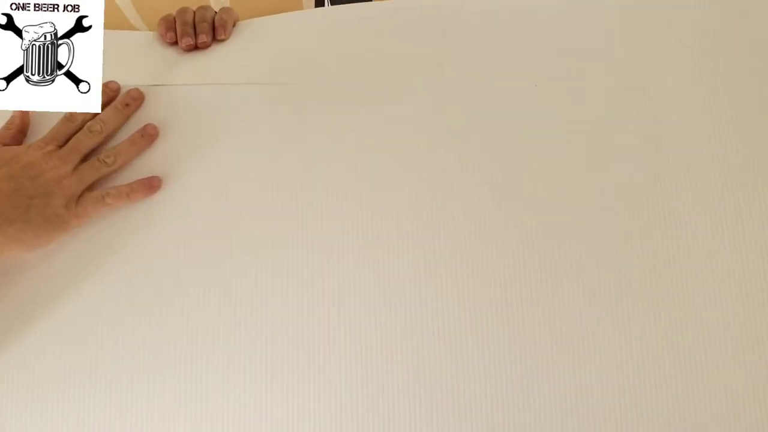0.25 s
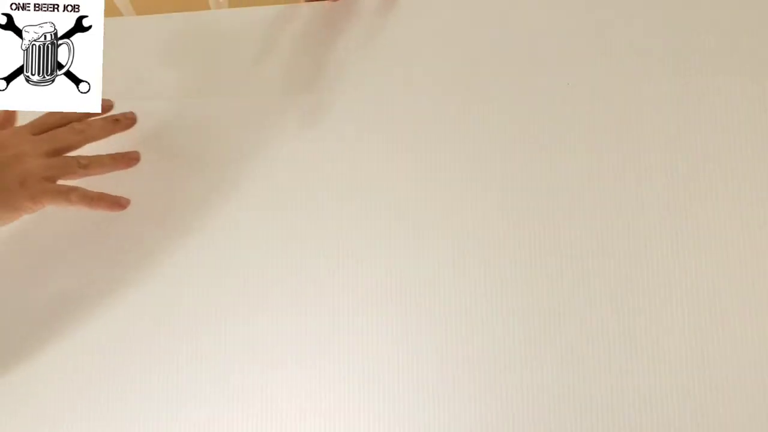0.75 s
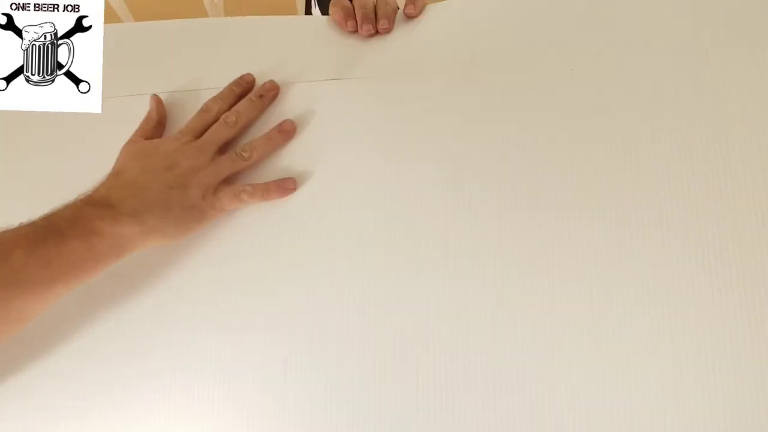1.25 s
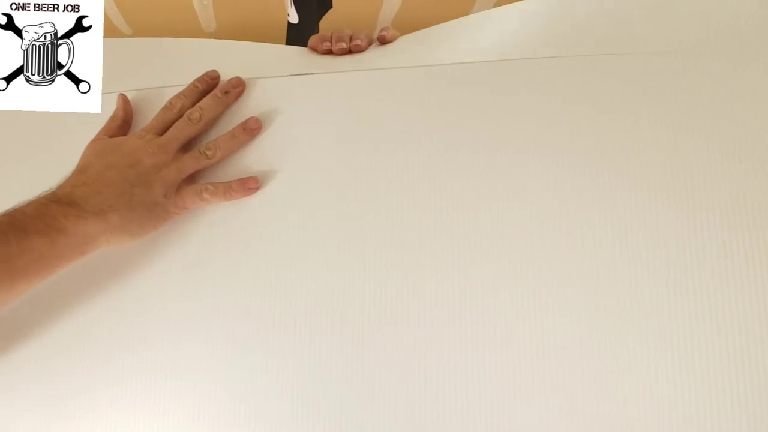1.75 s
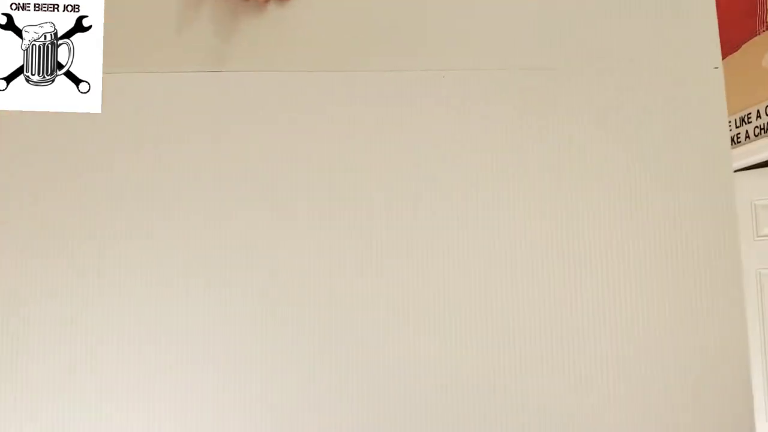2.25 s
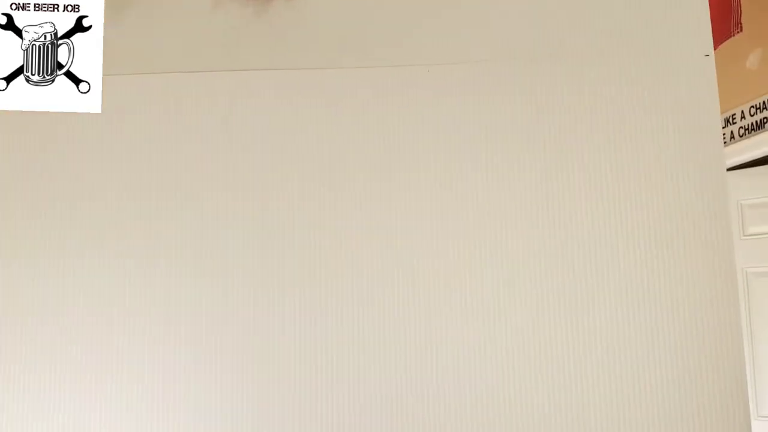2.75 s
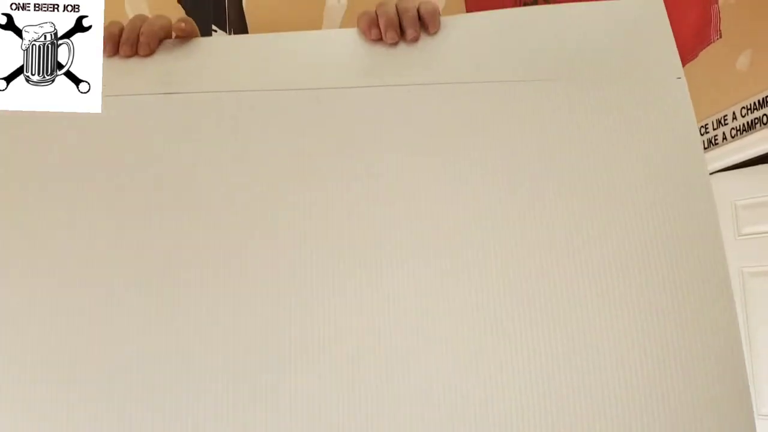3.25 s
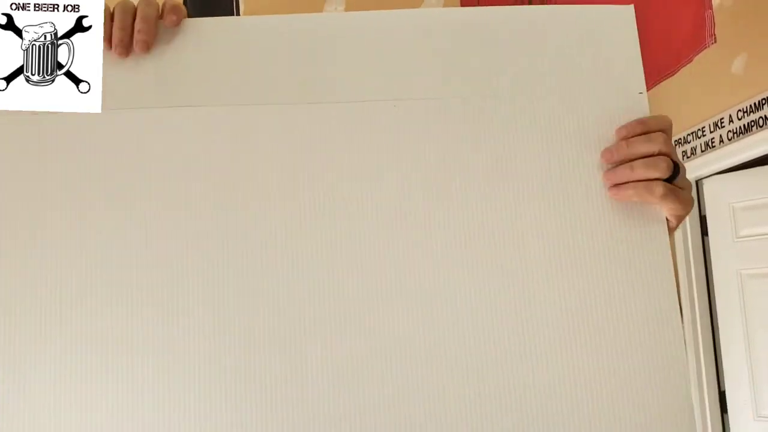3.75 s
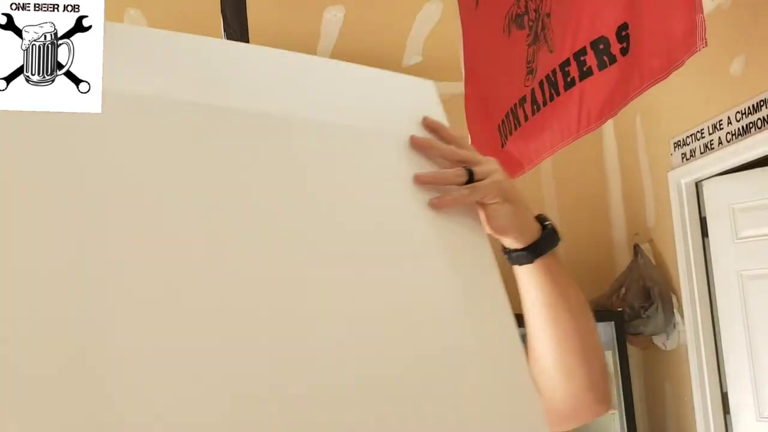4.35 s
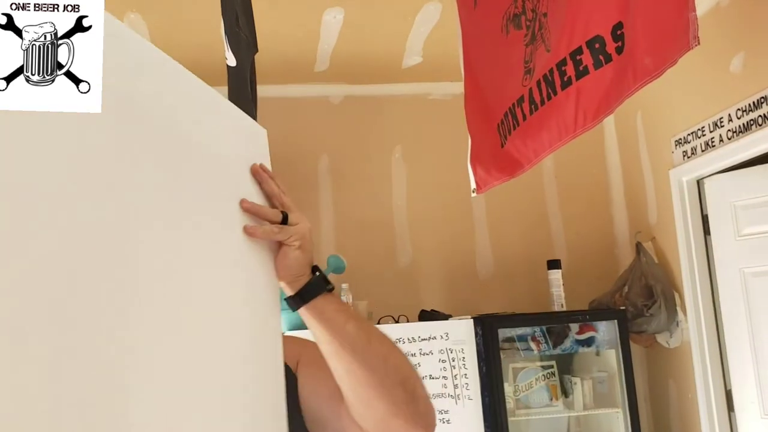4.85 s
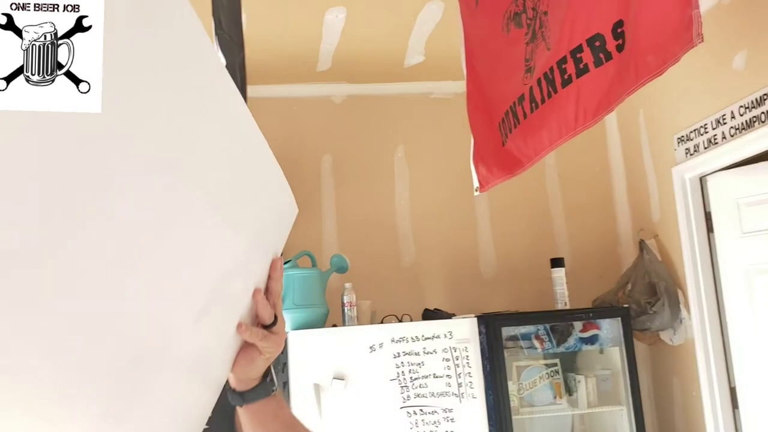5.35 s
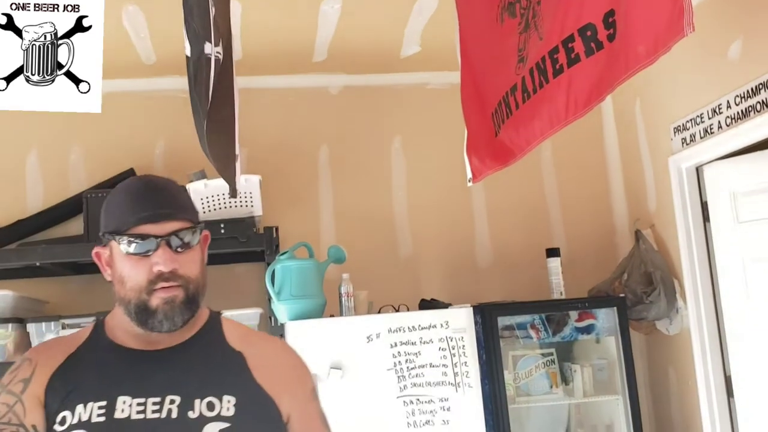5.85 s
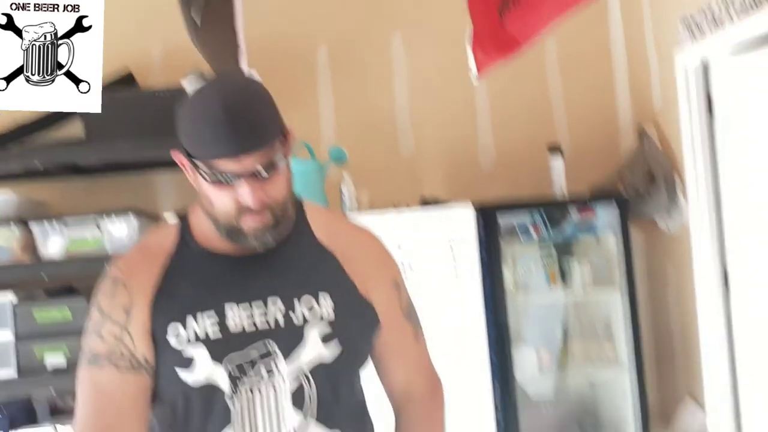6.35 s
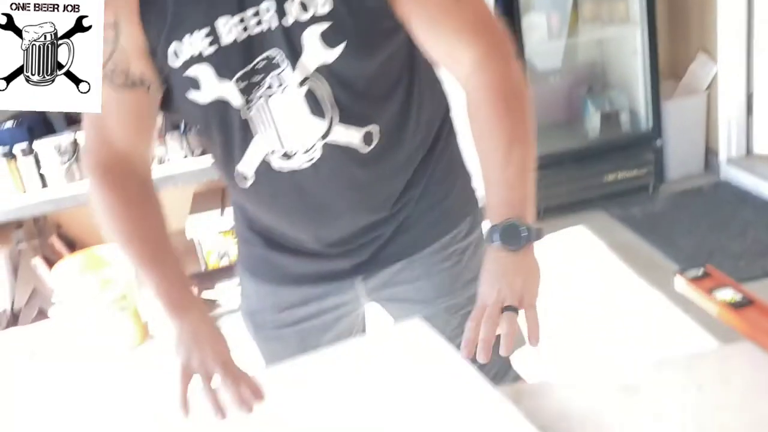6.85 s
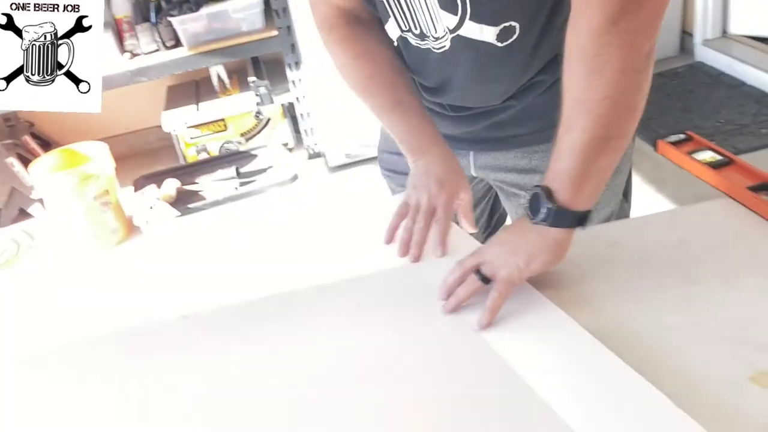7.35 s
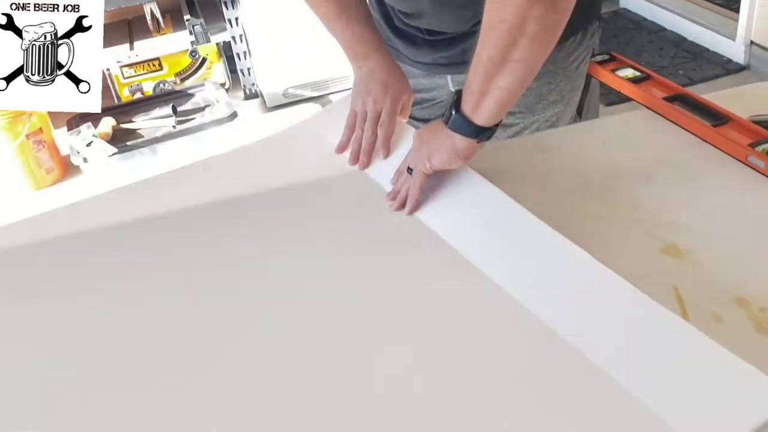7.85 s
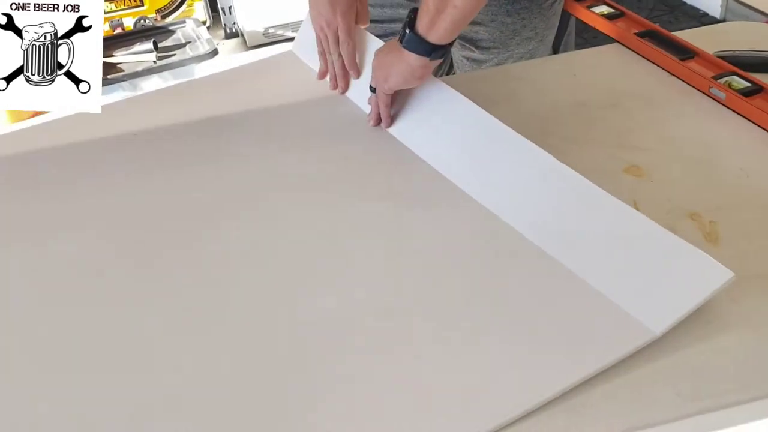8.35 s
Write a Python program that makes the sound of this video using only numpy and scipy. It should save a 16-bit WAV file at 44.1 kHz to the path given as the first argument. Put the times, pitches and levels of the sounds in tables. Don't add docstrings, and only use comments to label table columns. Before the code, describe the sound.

A low cooler hum runs steadily in a bare-walled garage. Close to a small camera, a large fluted plastic sheet starts with a soft bump, then at 0.4-0.7 s scrapes, clicks and booms hollowly. At 1.0-1.4 s come more knocks, hand rubs and dry ticks, then a near-quiet lull with faint fingertip pricks. From 2.0 to 3.1 s it drags, thumps and hisses under palms; 3.2-3.8 s brings a denser cluster of scrapes, ticks and a thin creak. Sparse ticks and rubs follow until 4.8 s, when the edge ratchets quickly. At 5.2 s a bright swish begins the turn, with a heavy thud at 5.55 s. Softer sliding fades through 6-7 s, with smoothing rubs near 7.4 s. Light knocks and clicks at 7.7 s lead to bending creaks around 8.0 s, then a very loud, sharp fold crack at 8.28 s, short slap echoes, a dying rattle and hum.

```python
import sys
import numpy as np
from scipy import signal
from scipy.fft import rfft, irfft, next_fast_len
from scipy.io import wavfile
from scipy.ndimage import uniform_filter1d

SR = 44100
rng = np.random.default_rng(int(sys.argv[2]) if len(sys.argv) > 2 else 0)


def amplitude_ratio(level_db):
    exponent = np.asarray(level_db, float) / 20
    return 10 ** exponent


def log_audio(samples):
    frames = np.atleast_2d(samples).T
    limited = np.clip(frames, -1, 1)
    pcm = np.round(limited * 32767).astype(np.int16)
    wavfile.write(sys.argv[1], SR, pcm)


N = 378495

# frequency in [Hz], level in [dB per Hz].
HUM_COLOUR = [(25, -13), (114, 2), (206, -7), (285, 4), (503, -20.5), (780, -11), (1040, -28.5),
              (1500, -27.5), (2100, -24.5), (2800, -70), (6740, -33), (8360, -57), (11900, -41.5),
              (16000, -34)]
# frequency in [Hz], level in [dB per Hz].
FLEX_COLOUR = [(15, -55), (25, -18), (48, -8), (96, -16.5), (130, 1), (209, -14), (276, -6.5), (400, -28),
               (520, -19.5), (880, -120)]
# frequency in [Hz], level in [dB].
DRAG_COLOUR = [(200, -11), (340, 1.5), (480, -1), (800, -8.5), (1250, -11), (1700, -31.5), (3000, -37.5)]
# frequency in [Hz], level in [dB].
SCRAPE_COLOUR = [(450, -11), (1000, -3), (1500, -1.5), (2150, -2.5), (2700, -4.5), (3300, -11),
                 (6500, -18.5), (16000, -22)]
# frequency in [Hz], level in [dB].
SLIDE_COLOUR = [(1800, -15), (3000, 3), (4300, -1.5), (5200, -1), (6800, 3), (10000, 2), (16000, -1.5)]
# time in [s], level in [dB].
SWAY = [(0, -44.5), (.35, -46.5), (.6, -27), (.8, -55), (1.2, -30), (1.55, -56.5), (2.45, -34.5),
        (2.75, -38), (3.0, -37), (3.15, -41.5), (3.7, -38), (3.95, -50.5), (5.0, -57.5), (5.27, -34.5),
        (5.4, -51), (6.4, -51.5), (7.3, -54.5), (8.0, -40.5)]
# peak in [s], rise in [s], fall in [s], drag in [dB], scrape over drag in
# [dB].
EDGE_STROKES = [(.058, 0.077, 0.081, -44.5, -13), (0.453, 0.03, 0.13, -33, 0),
                (.525, 0.026, 0.084, -38, -1), (.61, 0.078, 0.097, -37, -7), (.8, 0.17, 0.054, -62.5, 9),
                (1.081, 0.017, 0.3, -47, 2), (1.225, 0.3, 0.2, -40, -18), (1.27, 0.036, .07, -42, -9.5),
                (1.372, 0.035, 0.034, -41.5, -19), (1.41, 0.09, 0.055, -49.5, -13),
                (1.833, 0.061, 0.37, -46, -21.5), (2.073, 0.055, 0.095, -34.5, -10),
                (2.241, 0.053, 0.15, -31.5, -6.5), (2.478, 0.018, 0.3, -47, 6),
                (2.54, 0.26, 0.15, -40.5, -18), (2.93, 0.19, 0.56, -47, -13),
                (3.11, 0.64, 0.16, -58.5, 6.5), (3.27, 0.064, 0.14, -44, -12),
                (3.33, 0.023, 0.078, -39, -13), (3.395, 0.096, 0.14, -30.5, -11),
                (3.53, 0.068, 0.066, -44.5, -11), (3.468, .018, 0.057, -31.5, -3.5),
                (3.612, 0.038, 0.13, -36, -2), (3.787, 0.058, 0.11, -43.5, -5.5),
                (4.05, 0.14, 0.09, -58, -7.5), (4.301, 0.16, 1, -60, -4.5),
                (4.505, 0.071, 0.36, -47.5, -10.5), (4.77, 0.026, 0.73, -47, -10.5),
                (4.86, 0.059, 0.11, -50, -7), (4.91, .015, 0.05, -53, -10), (5.04, 0.051, 0.8, -51, -11),
                (5.206, 0.0091, 0.34, -43, 10.5), (5.26, 0.056, 0.24, -49, 17.3),
                  (5.455, 0.2, 0.13, -39, -1), (5.4, .1, .1, -45, 6), (5.55, 0.16, 0.19, -31.5, -1.5),
                  (5.68, 0.38, 0.23, -41.5, -1.5), (5.95, 0.23, 0.18, -53, 13.5),
                  (6.02, 0.25, .05, -53, 11.5), (6.22, 1, 1, -50, -10.5), (6.44, 0.018, 0.68, -62, 7),
                  (6.59, 0.22, 0.23, -47, -6.5), (6.655, 0.093, 0.12, -50, 3),
                  (7.169, 0.58, 0.63, -56.5, -5), (7.36, 0.022, 0.38, -47, -9),
                  (7.44, 0.12, 0.19, -52.5, 8), (7.703, 0.025, 0.09, -40, -4),
                  (7.926, .015, 0.15, -47.5, -13), (8.055, 0.082, 0.13, -43.5, -2.5),
                  (5.86, 0.51, 0.18, -48.5, 8), (7.97, 0.016, 0.19, -51, -3)]
# peak in [s], rise in [s],
# fall in [s], level in [dB], resonance in [Hz].
HAND_SLIDES = [(.058, 0.043, 0.079, -54, 5600), (.8, 0.31, 0.23, -55.5, 3340),
               (1.098, 0.045, 0.2, -44.5, 5500), (1.072, .008, .1, -49, 4460),
               (1.01, .015, .15, -56, 14500), (1.75, 0.25, 0.06, -66, 7000), (1.72, .1, .12, -67, 4400),
               (1.61, .1, .1, -68, 6300), (2.005, .012, .1, -62, 6800), (.35, .01, .25, -62, 6500),
               (.41, .08, .05, -58, 13000), (2.25, 0.045, 0.17, -43.5, 3500),
               (2.476, 0.035, 0.1, -43.5, 5230), (2.755, 0.072, 0.25, -49.5, 5240),
               (2.9, 0.04, 0.42, -48, 14500), (2.72, 0.032, 0.089, -55.5, 13000),
               (3.0, 0.18, 0.11, -48, 7000), (3.05, .015, 0.15, -47.5, 4700),
               (3.115, 0.14, 0.081, -45.5, 3500), (3.617, 0.03, 0.054, -36, 4600),
               (3.785, 0.071, 0.093, -42.5, 10000), (4.12, 0.15, 0.13, -63, 12000),
               (4.335, 0.081, 0.18, -51, 10700), (4.505, 0.022, 0.12, -49.5, 4300),
               (4.764, 0.011, 0.07, -49.5, 6500), (4.8, .04, .08, -53, 6000),
               (4.87, 0.14, 0.14, -50.5, 3900), (.53, 0.085, 0.065, -40.5, 4000),
               (0.461, 0.027, 0.05, -45.5, 12000), (.66, 0.2, 0.089, -53, 12300),
               (3.54, 0.05, 0.13, -52, 9090), (4.2, 0.18, 0.41, -63, 7600), (5.09, 0.18, 0.67, -59, 6250),
               (6.3, 0.23, 0.5, -54.5, 4480), (5.207, 0.013, 0.13, -28.5, 5000),
                  (5.265, 0.065, 0.084, -31.5, 4030), (5.55, 0.093, 0.036, -35, 3600),
                  (5.96, 0.22, 0.17, -42.5, 3780), (6.02, 0.17, 0.036, -44, 4230),
                  (6.441, 0.021, 0.23, -42, 4300), (7.1, 0.84, 0.64, -66, 3540),
                  (7.295, 0.1, 0.15, -55, 5500), (7.25, .03, .1, -59, 4200),
                  (7.375, 0.018, 0.24, -44.5, 3900), (7.42, 0.08, 0.14, -40, 3660),
                  (7.48, 0.12, 0.08, -45, 3640), (7.55, .1, .15, -58, 3500), (6.99, .08, .12, -62, 14000),
                  (7.67, .06, .06, -66, 14500)]
# time in [s], resonance height in [dB].
FLUTES_OPEN = [(5.1, 3.5), (5.2, 7), (5.72, 7), (5.85, 4)]
# frequency in [Hz], t60 in [s].
WALL_DECAY = [(100, 0.18), (500, 0.68), (2000, 0.53), (6000, 0.39), (12000, 0.17)]
# start in [s], peak in [dB], pitch in [Hz], t60 in [s].
BUMPS = [(0.039, -22.5, 85, 0.088), (0.43, -14, 297, 0.15), (0.5, -20.5, 172, 0.11),
         (1.051, -15.5, 109, 0.079), (2.238, -17, 420, 0.081), (2.05, -26, 140, .2), (2.9, -26, 50, .25),
         (2.479, -13, 67, 0.19), (2.538, -17, 134.6, 0.19), (2.846, -20.5, 98, 0.15),
         (3.391, -22.5, 260, 0.16), (3.604, -23.5, 184.5, 0.23), (5.439, -19, 300, 0.13),
         (5.475, -23, 310, .1), (5.543, -9, 128, 0.18), (5.546, -15, 215, .08), (5.565, -18, 340, .14),
         (5.59, -21, 400, .12), (5.24, -21, 140, .12), (5.22, -22, 52, .2), (6.641, -26, 120, 0.18),
         (7.701, -24, 385, 0.15), (0.519, -18, 160, 0.087), (.6, -22, 51.6, 0.22), (0.996, -23.5, 65, 0.16),
         (2.66, -21, 50, 0.13), (2.93, -27, 113, 0.54), (3.69, -28, 65, 0.43), (4.765, -28, 220, 0.12),
         (4.85, -29, 300, .1), (1.369, -21, 330, 0.083), (8.041, -25.5, 226, 0.23), (6.708, -32, 74, 0.36),
         (7.0, -34, 47, 0.22), (8.284, -26, 69, 0.19), (8.2878, -13.5, 139, .22),
         (8.2928, -13.5, 123.5, .24), (8.289, -15, 129, .11), (8.29, -22.5, 305, 0.33),
         (3.318, -20, 190, .07), (3.335, -21, 300, .09), (3.365, -22, 270, .1), (3.404, -17, 240, .09),
         (3.418, -19, 300, .1), (3.478, -20, 240, .08), (3.7, -29, 220, .15), (5.8, -25.5, 200, .2),
         (5.56, -18.5, 192, 0.18), (5.655, -26, 150, .12), (5.5, -34, 250, 0.13), (1.7, -29.5, 120, 0.25)]
# start in [s], peak in [dB], pitch in [Hz], brightness in [dB].
TICKS = [(0.436, -43, 1800, -17), (1.07, -31, 660, -26), (1.363, -43.5, 1050, -42), (1.411, -55, 660, -14),
         (1.81, -83, 754, -38), (1.834, -63, 760, -21), (2.002, -52, 636, -20), (2.04, -44, 786, -4),
         (2.22, -24, 910, -23), (2.472, -25.5, 2310, -11), (3.251, -65, 690, 17), (3.32, -38, 745, -18),
         (3.458, -18.5, 1080, -23), (3.601, -32, 830, -16), (3.794, -30, 865, 0), (3.975, -42, 750, -17.5),
         (4.043, -48, 730, 7), (4.223, -37, 630, -12), (4.5, -25.5, 660, -19), (4.605, -31.5, 697, -30),
         (4.644, -52, 820, -18), (4.69, -39, 824, -24.5), (4.763, -42, 760, 0), (4.796, -50, 1770, 2),
         (4.909, -34, 800, -15), (6.421, -64, 830, -18), (7.698, -28, 704, -36), (7.92, -54, 644, -24)]
# start in [s], peak in [dB], pitch in [Hz],
# brightness in [dB].
RIM_STEPS = [(4.8479, -38, 1780, -10), (4.9432, -35, 2000, -8), (5.013, -33.5, 2200, -16),
             (5.0536, -33.5, 2200, -14), (5.0912, -31.5, 1810, -14), (5.126, -34, 1840, -14),
             (5.1506, -33.5, 1970, -10), (5.1866, -36, 2200, -14), (4.909, -35, 1300, -10),
             (5.111, -38, 1200, -20), (5.081, -39, 1000, -20), (5.034, -40, 900, -22),
             (4.768, -33, 900, -14), (1.092, -29, 900, -14), (1.142, -29, 1500, -14),
             (1.155, -28, 900, -18), (1.172, -28, 1600, -14), (1.267, -31, 1300, -12),
             (1.371, -33, 1100, -12), (1.404, -38, 900, -22), (1.412, -35, 1900, -4), (1.81, -42, 800, -30),
             (1.837, -41, 900, -12), (0.437, -26, 1000, -14), (0.447, -23, 1400, -14),
             (0.454, -22, 1800, -16), (0.463, -24, 1700, -14), (0.474, -27, 1300, -14),
             (2.041, -37, 900, -16), (2.053, -33, 1200, -16), (2.22, -32, 900, -14),
             (0.607, -31, 1100, -16), (0.524, -30, 1300, -12), (1.362, -36, 1100, -16),
             (2.397, -37, 1200, -16), (2.44, -38, 1200, -16), (3.257, -38, 1300, -18),
             (3.32, -30, 1300, -14), (3.372, -30, 1200, -16), (3.456, -23, 1900, -10),
             (3.772, -33, 1500, -8), (7.698, -31, 1100, -18), (7.712, -32, 2100, -14),
             (7.92, -34, 1300, -28), (8.0, -28, 1300, -16), (8.02, -23, 1100, -18), (8.105, -31, 1500, -12),
             (8.131, -36, 900, -20)]
# start in [s], end in [s], rate in [slips per s], resonance in [Hz], level in [dB].
CREAKS = [
    (.52, .545, 200, 1600, -33),
    (.595, .63, 180, 1000, -31),
    (1.36, 1.385, 200, 2350, -41),
    (3.63, 3.675, 90, 2450, -33),
    (3.675, 3.765, 75, 2450, -43),
    (5.105, 5.145, 170, 520, -33),
    (7.965, 8.05, 190, 1120, -26),
    (8.03, 8.082, 200, 800, -25),
    (8.05, 8.08, 170, 1200, -28),
    (8.085, 8.14, 130, 900, -34),
]
# start in [s], peak in [dB], pitch in [Hz].
PEELS = [
    (1.5562, -60, 6400),
    (1.6036, -58, 6700),
    (1.6645, -58, 7100),
    (1.7009, -64.5, 6450),
    (1.7383, -63, 6800),
    (1.31, -58.5, 6200),
]
# start in [s], level in [dB], brightness in [dB], left over right in [dB].
CRACKS = [
    (8.28142, 14.3, -21, 3.7),
    (8.2885, 7, -15, 8),
    (8.2945, -2, -9, -3),
    (8.3007, 1, -16, 7),
    (8.310, -4, -14, -4),
]
# frequency in [Hz], level in [dB], t60 in [s].
CRACK_MODES = [(700, -33, .02), (1000, -15, .012), (1385, 19.5, .0028)]
# frequency in [Hz], level in [dB per Hz].
RATTLE_COLOUR = [(35, -45), (60, -19), (146, 1), (469, -7), (666, -1), (882, -7.5), (1220, -0.5),
                 (3190, -13), (6740, -18), (8120, -12.5), (16000, -23)]
# frequency in [Hz], likeness from 0 to 1 [ratio].
LEFT_RIGHT_ALIKE = [(30, .97), (200, 0.96), (400, 0.93), (800, 0.49), (1500, 0), (3000, 0), (12000, 0.065)]
# frequency in [Hz], gain in [dB].
MIC_RESPONSE = [(20, -29), (45, 0.5), (6900, -0.5), (7500, -4.5), (8300, -16), (9500, -12.5), (12000, -3.5),
                (15500, -2)]

STROKE_DEPTH_DB, CROWN, IDLE_DB = 22, 1.08, -76
SHAKE_DB, SKIN_DB = -2.5, -8
GRIP_HZ, LET_GO_S = 3900, 8.38


def unit(x):
    return x / np.sqrt(np.mean(x ** 2) + 1e-20)


def along(points, hz):
    f, v = np.transpose(points)
    return np.interp(np.log(hz + 1), np.log(f + 1), v)


def wobble(rate):
    knots = rng.standard_normal(N // 64)
    return np.interp(np.arange(N) * rate / SR, np.arange(len(knots)), knots)


def filtered(x, response):
    m = next_fast_len(N + 8192)
    return irfft(rfft(x, m) * response(np.fft.rfftfreq(m, 1 / SR)), m)[..., :N]


def half_angle(hz):
    return np.arccos(np.clip(along(LEFT_RIGHT_ALIKE, hz), -1, 1))[:, None] / 2


def rush(spectrum, grit=1, patchy_db=2, size=1024, count=N, moving=lambda hz, t: 1):
    hz, t, z = signal.stft(grit * rng.standard_normal((2, count)), SR, nperseg=size)
    patches = uniform_filter1d(rng.standard_normal(z.shape[1:]), size=9, axis=0)
    patches = uniform_filter1d(patches, size=5, axis=1)
    turn = half_angle(hz)
    z = z * amplitude_ratio(patchy_db * unit(patches) + along(spectrum, hz)[:, None]) * moving(hz[:, None], t)
    mid, side = signal.istft(z * [np.cos(turn), np.sin(turn)], nperseg=size)[1][:, :count]
    return np.array([mid + side, mid - side]) / np.std(mid)


def panned(x, left_db):
    return x * amplitude_ratio(np.array([[.5], [-.5]]) * left_db)


def ring(hz, t60, attack, t):
    return np.sin(2 * np.pi * hz * t) * amplitude_ratio(-60 * t / t60) * (1 - np.exp(-t / attack))


def add(track, s, x):
    track[:, round(s * SR):][:, :x.shape[1]] += x


def cooler():
    drift_db = 1.8 * wobble(3.29)
    return panned(amplitude_ratio(-51.0 + drift_db) * rush(HUM_COLOUR, patchy_db=0.5, size=2048), 2.8)


def strokes(rows):
    peak, rise, fall, db, _ = np.transpose(rows)[..., None]
    t = np.arange(N * 1000 // SR + 2) / 1000
    away = np.maximum((peak - t) / rise, (t - peak) / fall)
    return t, amplitude_ratio(2 * (db - STROKE_DEPTH_DB * away ** CROWN))


def flexing_boom(gain):
    noise = rush(FLEX_COLOUR, grit=amplitude_ratio(2.5 * wobble(30)), patchy_db=4.0, size=2048)
    return panned(gain * amplitude_ratio(-2.0) * noise, 0.76)


def edge_drag(gain, slips_db):
    return panned(gain * amplitude_ratio(-1) * rush(DRAG_COLOUR, grit=amplitude_ratio(.75 * slips_db), patchy_db=1.5), 2.7)


def edge_scrape(gain, slips_db):
    def flutes(hz, at):
        height_db = np.interp(at, *np.transpose(FLUTES_OPEN))
        return amplitude_ratio(height_db / (1 + ((hz - 2170) / 150) ** 2))

    noise = rush(SCRAPE_COLOUR, grit=amplitude_ratio(0.41 * slips_db), patchy_db=2.3, moving=flutes)
    return panned(gain * amplitude_ratio(-0.44) * noise, 3.5)


def hand_slide(gain, slips_db, ms, contact_hz, shares):
    def contact(hz, at):
        peaks = amplitude_ratio(10.5 / (1 + ((hz - contact_hz) / 800) ** 2))
        return peaks @ shares[:, np.searchsorted(ms[:-1], at)]

    noise = rush(SLIDE_COLOUR, grit=amplitude_ratio(0.27 * slips_db), patchy_db=1.6, moving=contact)
    return panned(gain * amplitude_ratio(0.1) * noise, 5.7)


def handling():
    edge_rows, hand_rows = EDGE_STROKES, HAND_SLIDES
    ms, edge = strokes(edge_rows)
    hands = strokes(hand_rows)[1]
    dragging = edge.sum(axis=0)
    scraping = (edge * amplitude_ratio(2 * np.array(edge_rows)[:, 4:])).sum(axis=0) + amplitude_ratio(2 * IDLE_DB)
    flexing = amplitude_ratio(2 * np.interp(ms, *np.transpose(SWAY))) + amplitude_ratio(2 * SHAKE_DB) * dragging
    grip = amplitude_ratio(2 * SKIN_DB) * scraping
    sliding = hands.sum(axis=0) + grip
    contact_hz = np.append(np.array(hand_rows)[:, 4], GRIP_HZ)
    shares = np.vstack([hands, grip]) / sliding

    t = np.arange(N) / SR
    flex_gain, drag_gain, scrape_gain, slide_gain = [
        np.interp(t, ms, np.sqrt(power)) for power in (flexing, dragging, scraping, sliding)]
    slips_db = 3.4 * wobble(45) + 3 * wobble(260)
    rubbing = flexing_boom(flex_gain) + edge_drag(drag_gain, slips_db) + edge_scrape(scrape_gain, slips_db)
    rubbing = rubbing + hand_slide(slide_gain, slips_db, ms, contact_hz, shares)
    letting_go = np.clip((LET_GO_S - t) / 0.05, 0, 1)
    return letting_go * rubbing


def garage(x):
    out, step = np.zeros((2, N + 2 * SR)), SR // 3
    for start in range(0, N, step):
        hz, t, z = signal.stft(rng.standard_normal((2, SR // 2)), SR, nperseg=256)
        turn = half_angle(hz)
        z = np.cos(turn) * z[0] + np.sin(turn) * z[1] * [[[1]], [[-1]]]
        decay = amplitude_ratio(-60 * t / along(WALL_DECAY, hz)[:, None])
        tail = signal.istft(z * decay, SR, nperseg=256)[1]
        wet = signal.fftconvolve(x[:, start:start + step], tail / np.linalg.norm(tail[0]), axes=1)
        add(out, start / SR + .008, wet)
    return out[:, :N]


def bumps():
    out, t = np.zeros((2, N + SR)), np.arange(SR // 2) / SR
    for s, db, hz, t60 in BUMPS:
        thud = ring(hz, t60, 0.0034, t) + 0.15 * ring(1.1 * hz, 0.57 * t60, 0.0092, t)
        add(out, s, panned(amplitude_ratio(db - 7.5) * thud, 1.6))
    return out[:, :N]


def ticks():
    out, t = np.zeros((2, N + SR)), np.arange(4000) / SR
    t60, note_db, note_yields = 0.033, -8, 0.76
    dull = signal.butter(2, [500, 3000], "bandpass", fs=SR)
    for s, db, hz, bright_db in TICKS:
        noise = rng.standard_normal((2, 2, len(t) + 1))
        note = amplitude_ratio(note_db - note_yields * (db + 37.5)) * ring(hz, t60, 0.00074, t)
        snap = amplitude_ratio(-12.5) * signal.lfilter(*dull, noise[0])[:, 1:]
        crack = amplitude_ratio(min(bright_db, -6) - 2.0) * np.diff(noise[1])
        tick = note + (snap + crack) * amplitude_ratio(-60 * t / t60)
        add(out, s, panned(amplitude_ratio(db + 6.0) * tick, 6.3))
    return out[:, :N]


def rim_step(hz, t):
    main = ring(hz, .0045, .0003, t)
    return main + .3 * ring(1.4 * hz, .003, .0003, t) + .8 * ring(.62 * hz, .004, .0003, t)


def ratchet():
    out, t = np.zeros((2, N + SR)), np.arange(SR // 20) / SR
    rebound, rebound_s = .45, .0023
    edge = ring(4300, .002, .0002, t) + ring(6600, .002, .0002, t)
    push = .7 * ring(700, .008, .0004, t)
    for s, db, hz, bright_db in RIM_STEPS:
        click = rim_step(hz, t) + rebound * rim_step(hz, np.maximum(t - rebound_s, 0))
        add(out, s, panned(amplitude_ratio(db + 3) * (click + amplitude_ratio(bright_db) * edge + push), 4.3))
    return out[:, :N]


def creaks():
    out, t = np.zeros((2, N + SR)), np.arange(SR // 20) / SR
    for start, end, rate, hz, db in CREAKS:
        t60 = 1.6 / rate
        chance = rng.standard_normal((40, 3))
        count = np.arange(len(chance))
        times = start + (count + 0.243 * chance[:, 0] * (count > 0)) / rate
        for s, (_, size, tune) in zip(times[times < end], chance):
            swell = 0.6 + 0.41 * np.sin(np.pi * (s - start) / (end - start))
            slip = ring(hz + .9 * tune / t60, t60, .0003, t)
            add(out, s, panned(amplitude_ratio(db + 2.5 * size) * swell * slip, 2.5))
    return out[:, :N]


def peels():
    out, t = np.zeros((2, N + SR)), np.arange(SR // 20) / SR
    for s, db, hz in PEELS:
        prick = ring(hz, 0.018, 0.00033, t) + .6 * ring(1.09 * hz, .009, .0003, t)
        prick = prick + .6 * ring(.53 * hz, 0.008, 0.00037, t)
        add(out, s, panned(amplitude_ratio(db + 3) * prick, 3.7))
    return out[:, :N]


def fold():
    out, t = np.zeros((2, N + SR)), np.arange(SR // 2) / SR
    yielding = 1 - np.exp(-(t / .0013) ** 4)
    pop = sum(amplitude_ratio(level) * ring(hz, t60, .0015, t) for hz, level, t60 in CRACK_MODES)
    for s, db, bright_db, left_db in CRACKS:
        spit = signal.lfilter([1, -.25], 1, rng.standard_normal((2, len(t))))
        spit = spit * amplitude_ratio(bright_db + 1.5 - 60 * t / 0.0085)
        add(out, s, panned(amplitude_ratio(db) * yielding * (pop + spit), left_db))
    swell = 1 - np.exp(-(t / 0.0085) ** 2)
    rattle = amplitude_ratio(-20.0 - 60 * t / 0.31) * swell * rush(RATTLE_COLOUR, count=len(t))
    add(out, CRACKS[0][0], panned(rattle, 4.2))
    return out[:, :N]


def scene():
    hum, rubbing, crack = cooler(), handling(), fold()
    hits = bumps() + ticks() + ratchet() + creaks() + peels()
    wet = garage(amplitude_ratio(-10.0) * rubbing + amplitude_ratio(-11.5) * hits + amplitude_ratio(-10.5) * crack)
    return filtered(rubbing + hits + crack + wet, lambda hz: amplitude_ratio(along(MIC_RESPONSE, hz))) + hum


def low_pass(x):
    return signal.sosfilt(signal.butter(12, 16790, fs=SR, output="sos"), x)


def record(dry):
    mix = filtered(dry, lambda hz: hz < 15850)
    return low_pass(mix)


dry = scene()
out = record(dry)
log_audio(out)
```